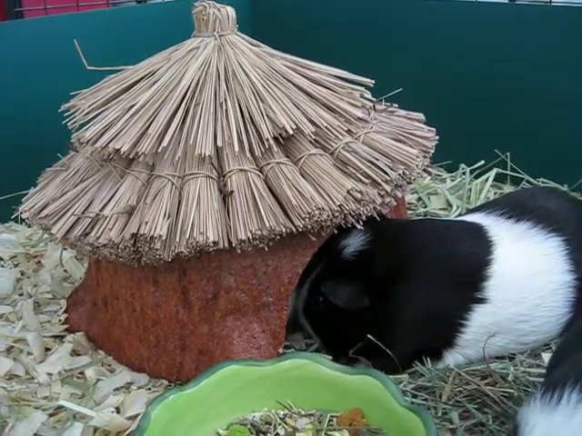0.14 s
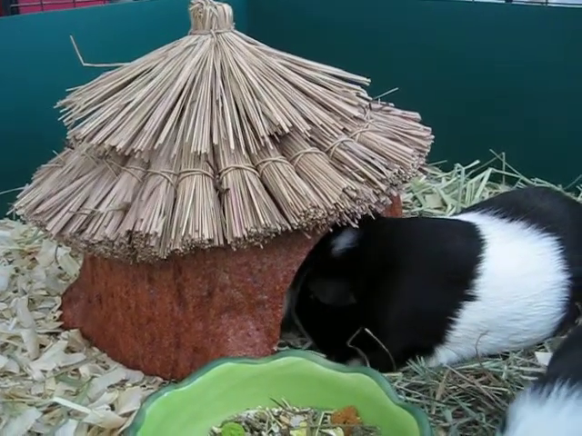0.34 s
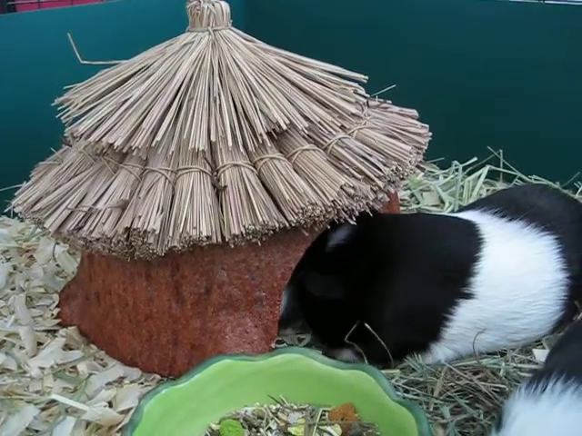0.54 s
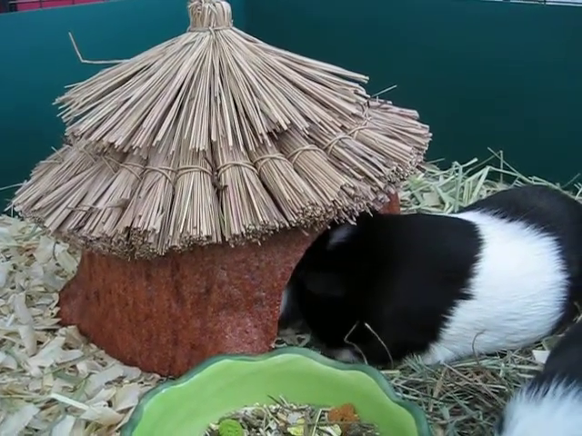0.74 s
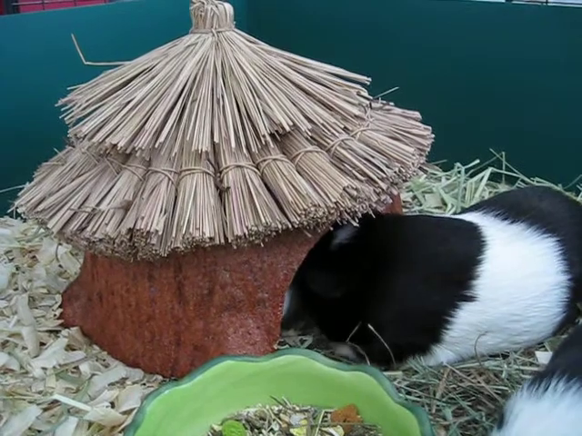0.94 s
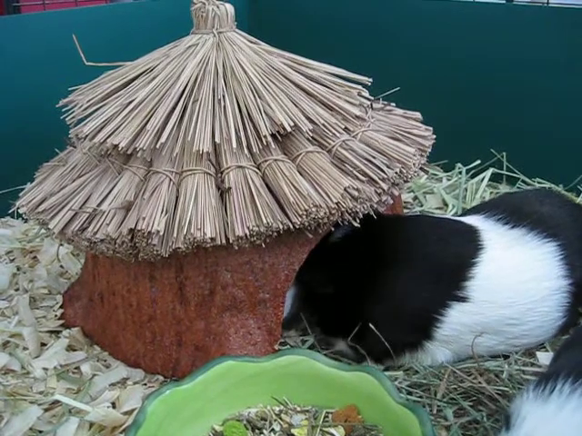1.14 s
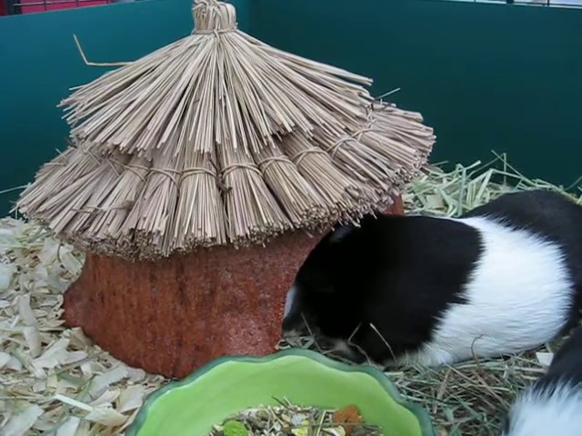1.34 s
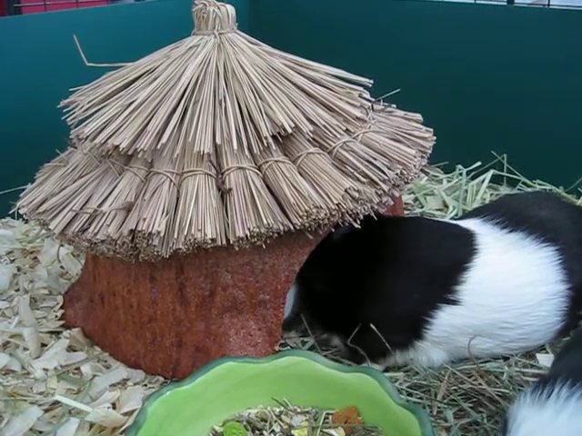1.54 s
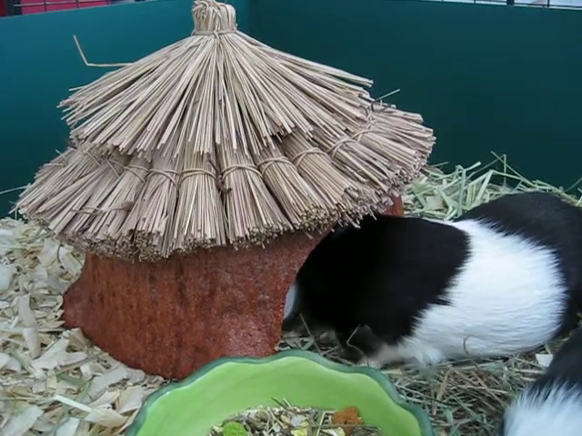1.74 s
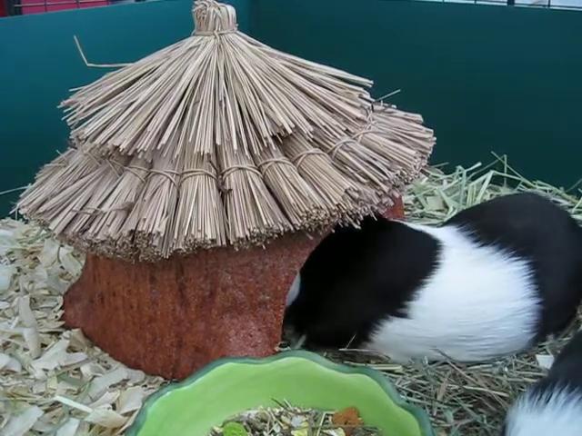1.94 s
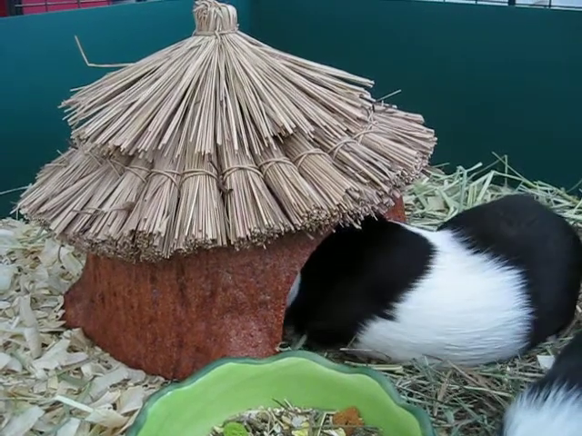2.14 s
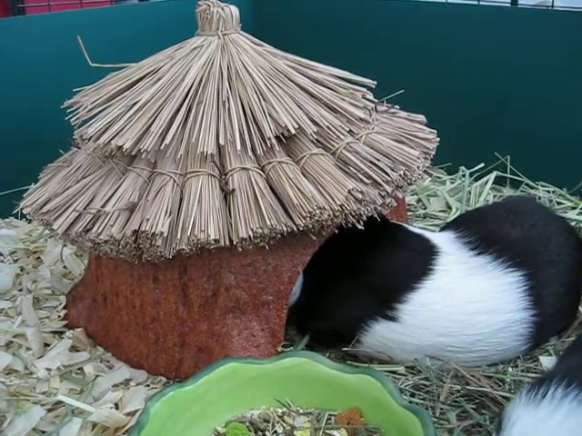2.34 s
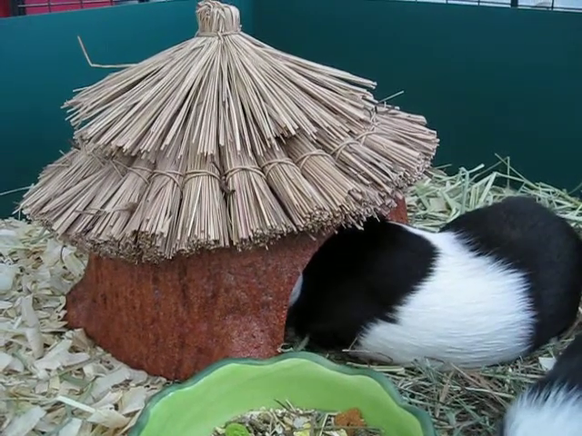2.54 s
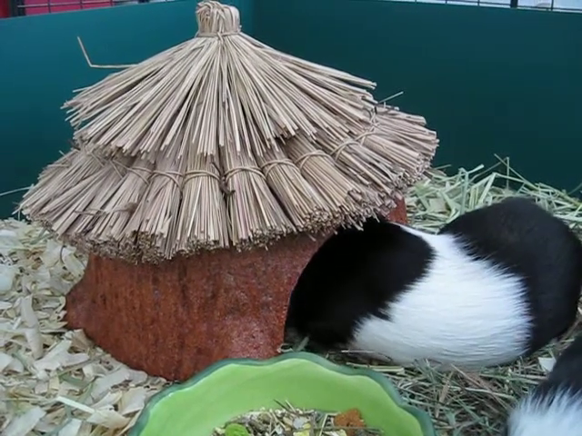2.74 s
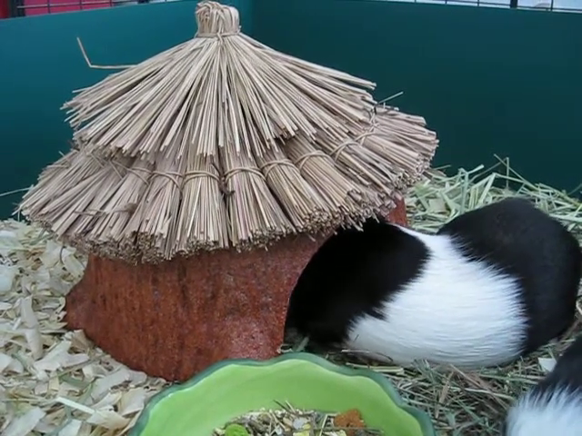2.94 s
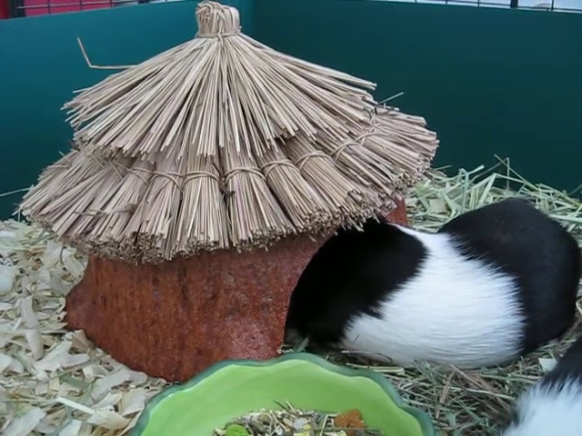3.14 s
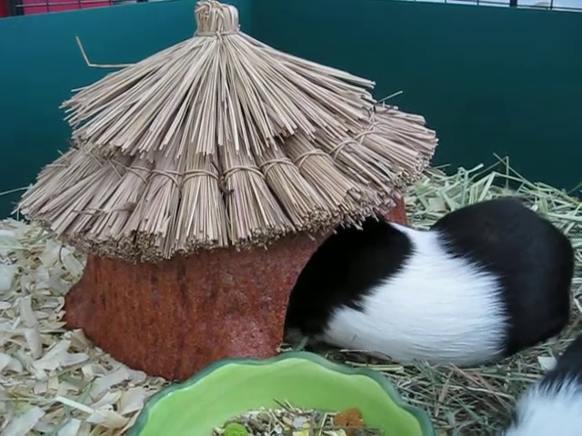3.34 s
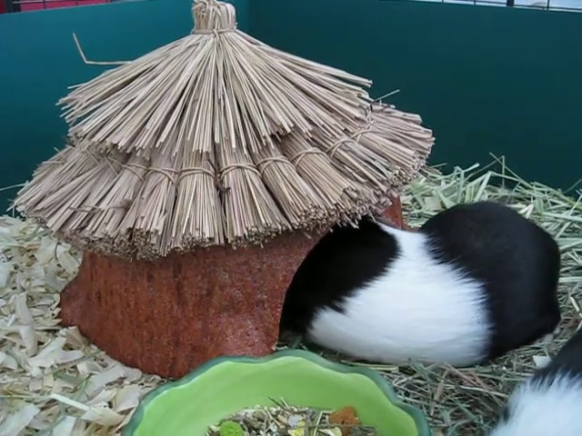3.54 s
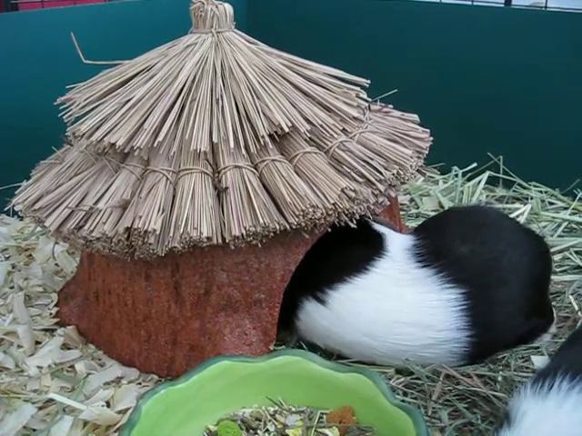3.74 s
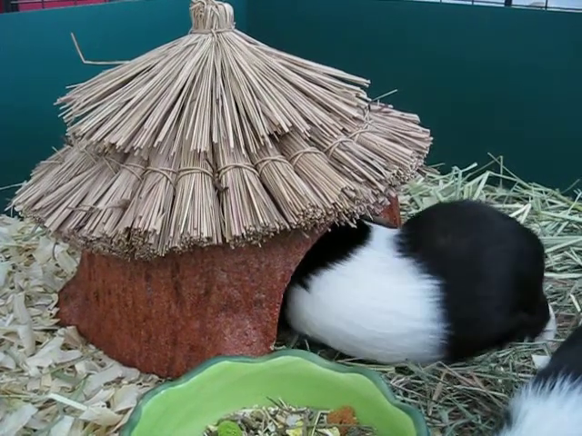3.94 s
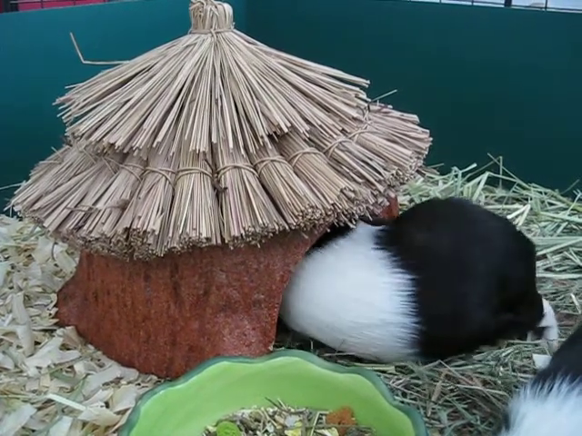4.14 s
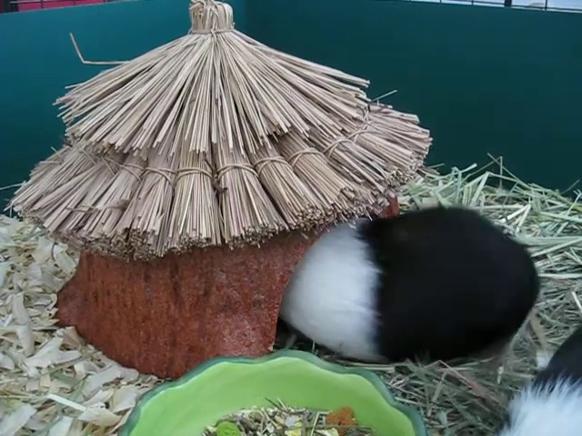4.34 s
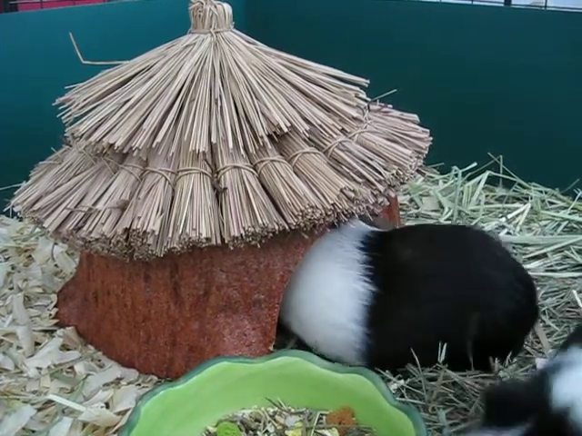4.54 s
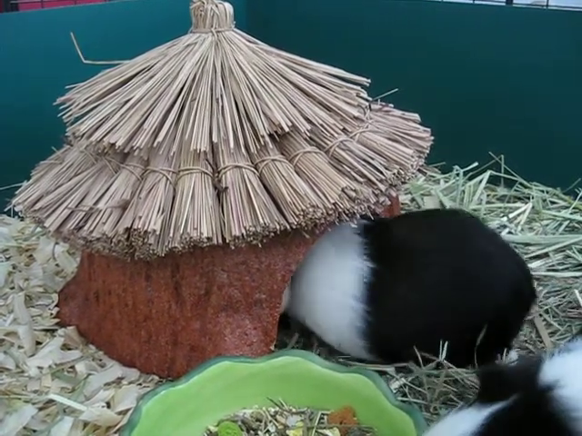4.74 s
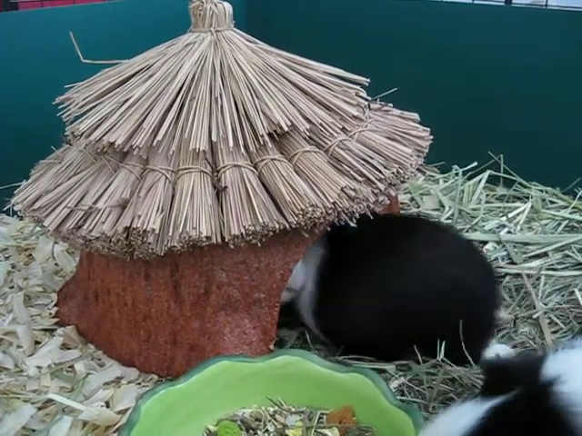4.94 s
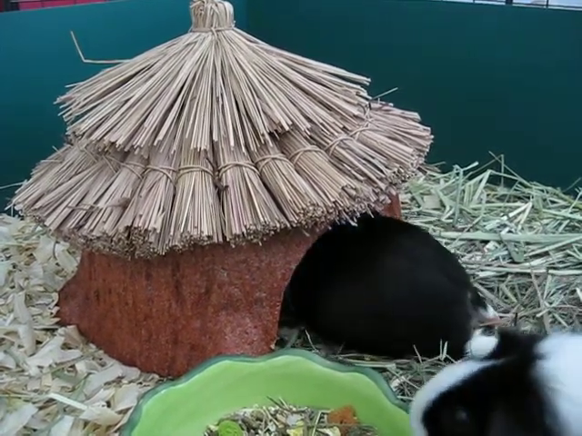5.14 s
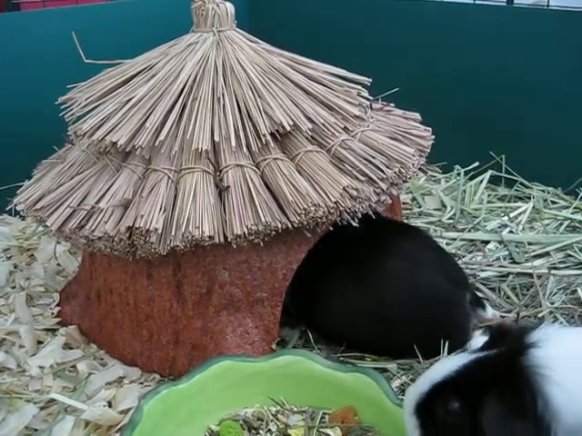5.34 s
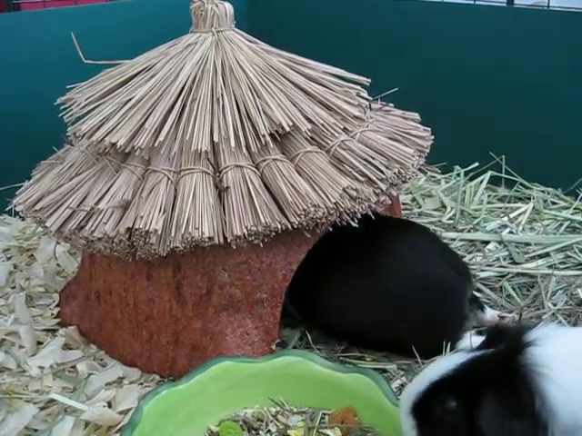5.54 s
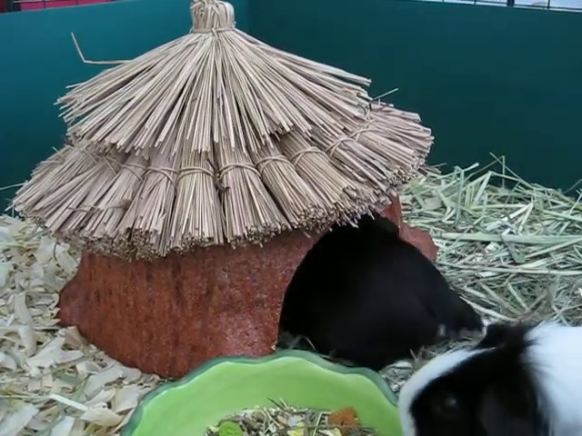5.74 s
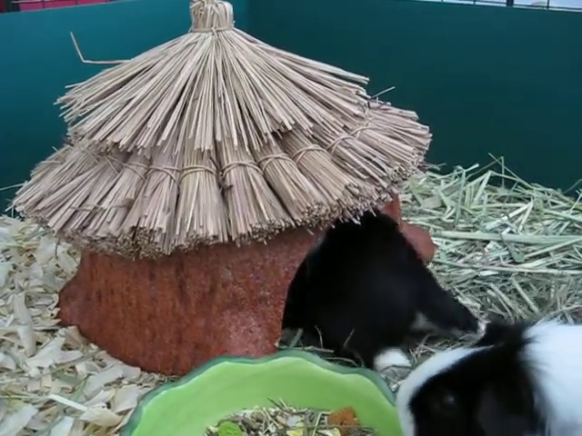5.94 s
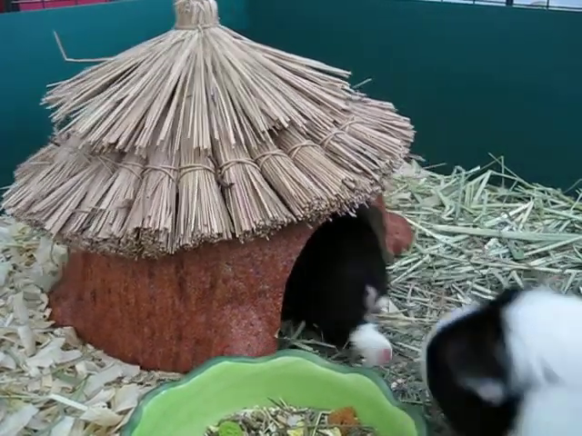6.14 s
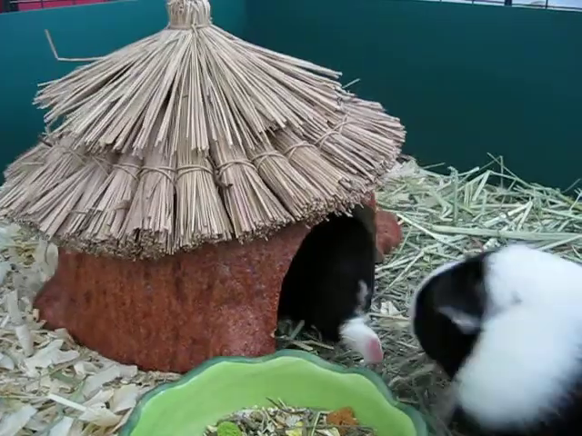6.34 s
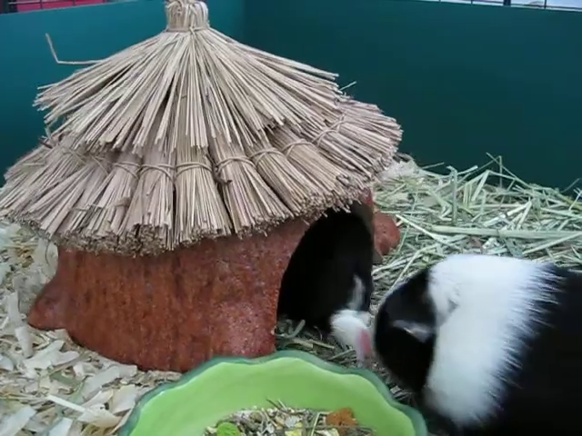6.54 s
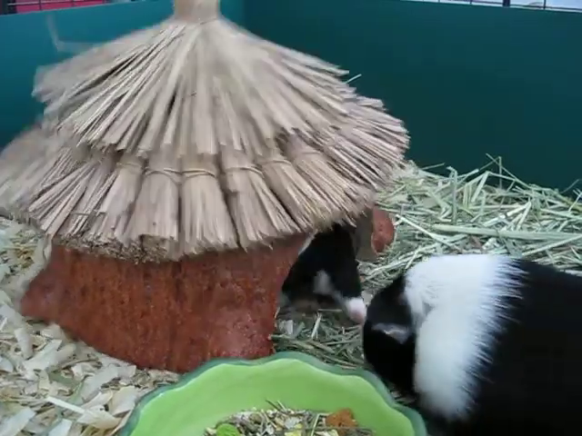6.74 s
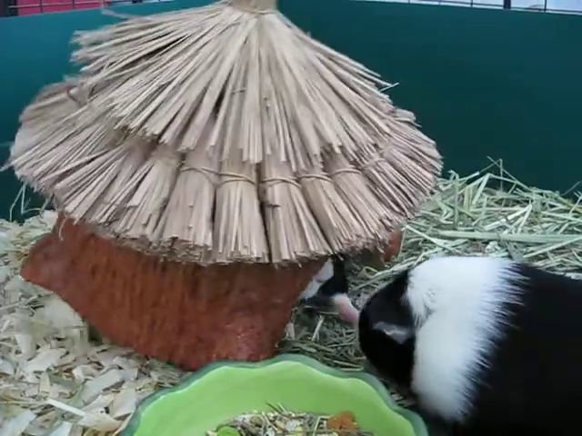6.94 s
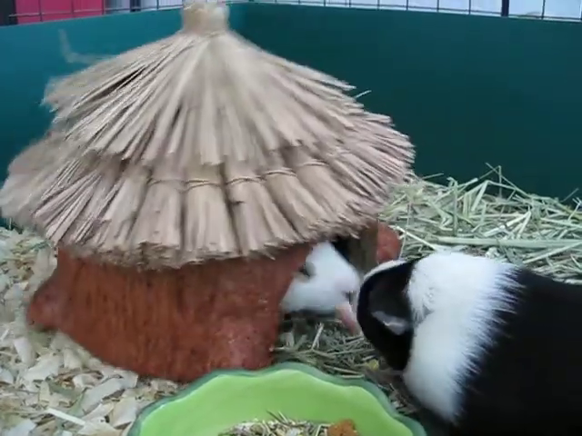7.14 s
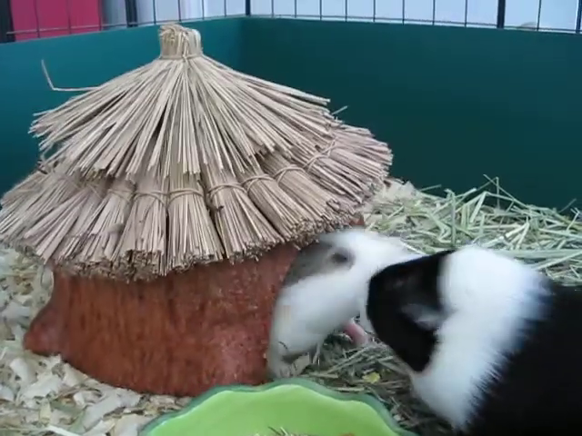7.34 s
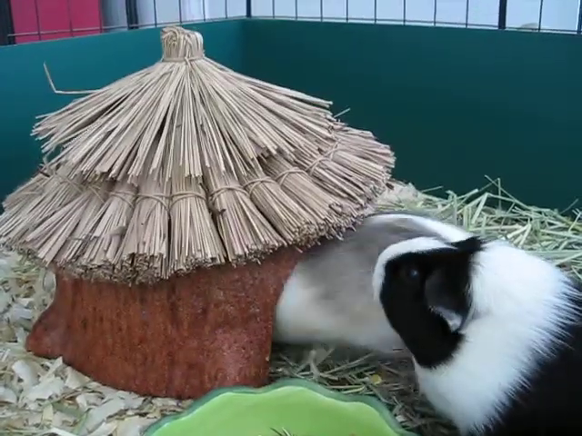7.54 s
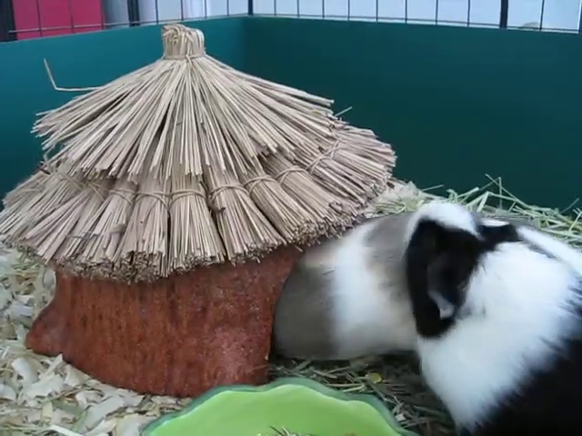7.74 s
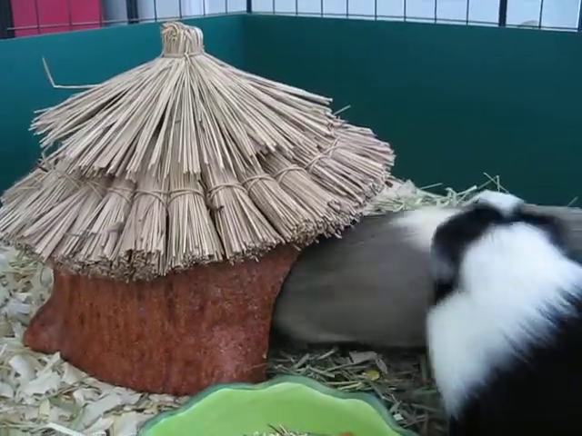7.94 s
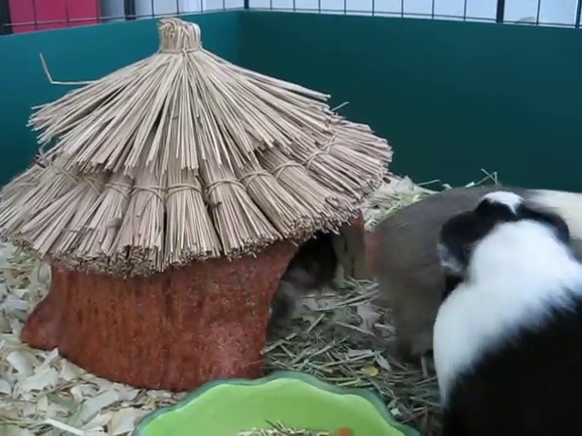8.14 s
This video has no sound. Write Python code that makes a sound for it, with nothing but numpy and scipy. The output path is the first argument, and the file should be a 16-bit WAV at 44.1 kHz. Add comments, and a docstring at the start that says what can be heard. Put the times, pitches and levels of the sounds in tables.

```python
"""Guinea pigs chut, squeak and whine in a plastic cage, close by: their vocal folds make a harmonic tone
that the throat filters and a hollow hut prolongs. One chuts softly while it pushes into the hut; then they
crowd the doorway, squeaking in rising glides among short, low bumps. Each shove rustles the dry hay by
stick-slip friction; stalks snap or are bitten through, paws excite the modes of the tray, and the room
hums faintly."""
import sys
import numpy as np
from scipy import signal
from scipy.fft import rfft, irfft
from scipy.io import wavfile

SR = 44100
rng = np.random.default_rng(int(sys.argv[2]) if len(sys.argv) > 2 else 0)


def dump_mix(stems):
    """Bounce the given channels to the path in sys.argv[1] as a 16-bit WAV at rate SR."""
    frames = np.atleast_2d(stems).T  # one column per channel
    limited = np.clip(frames, -1, 1)  # hard clip at full scale
    pcm = np.round(limited * 32767).astype(np.int16)
    wavfile.write(sys.argv[1], SR, pcm)


N = 366030


def undb(db):
    """Decibels to amplitude ratio."""
    return 10 ** (np.asarray(db) / 20)


def level(x, db=0):
    """Scale to an rms level."""
    return x * undb(db) / np.sqrt(np.mean(x ** 2))


def seconds(length):
    """Time axis of a short sound."""
    return np.arange(int(length * SR)) / SR


def add(out, start_s, x):
    """Superposition: mix x into out from start_s."""
    i = int(start_s * SR)
    out[i:i + len(x)] += x[:max(N - i, 0)]


def gain_at(spectrum, hz):
    """Gain of a (frequency_hz, level_db) curve, interpolated in log frequency."""
    knots_hz, db = np.transpose(spectrum)
    return undb(np.interp(np.log(hz + 1), np.log(knots_hz), db))


def ring(x, hz, width_hz):
    """Second-order resonance, gain 1 at its centre."""
    return signal.lfilter(*signal.iirpeak(hz, hz / width_hz, fs=SR), x)


def band(x, hz, width_hz):
    """Two equal resonances in cascade: a pass band with steeper skirts."""
    return ring(ring(x, hz, width_hz), hz, width_hz)


def wander(rate_hz, size):
    """Slow random modulation with a spread near 1."""
    place = np.arange(size) * rate_hz / SR
    knots = rng.standard_normal(int(place[-1]) + 2)
    return np.interp(place, np.arange(len(knots)), knots)


def decay(t, t60_s):
    """Exponential damping: 60 dB down at t60_s."""
    return np.exp(-np.log(1000) * t / t60_s)


# spectrum of the room's air: frequency_hz, relative_db
AIR_SPECTRUM = [(15, -37), (25, -11), (92, -9), (198, -6), (223, -7), (256, -4), (347, -6.5), (606, -6),
                (665, -7.5), (879, -7.5), (1060, -10.5), (1650, -16), (2450, -18), (3810, -21),
                (6500, -23.5), (8450, -31), (14300, -120)]
# room resonances: centre_hz, half_width_hz (of each filter stage), level_db
ROOM_MODES = [(201.5, 9.7, -69.5), (257.5, 32, -69.5), (321.6, 13, -71.5), (612, 68, -58.5)]


def room_tone(air_db=-53, hiss_db=-68):
    """Noise-driven room resonances hum over steady indoor air and a thin hiss."""
    shape = gain_at(AIR_SPECTRUM, np.fft.rfftfreq(N, 1 / SR))
    air = level(irfft(rfft(rng.standard_normal(N)) * shape, N), air_db)
    hum = sum(level(band(rng.standard_normal(N), hz, 2 * half_width_hz), db)
              for hz, half_width_hz, db in ROOM_MODES)
    return air + hum + level(rng.standard_normal(N), hiss_db)


def reverberate(x, cage_db, room_db, cage_t60_s, room_t60_s=0.35):
    """Reverberation: quick reflections from the cage walls, then the faint tail of the room."""
    t = seconds(0.32)
    response = np.zeros(len(t))
    for db, t60_s in ((cage_db, cage_t60_s), (room_db, room_t60_s)):
        tail = rng.standard_normal(len(t)) * decay(t, t60_s) * (t > .002)
        response += undb(db) * tail / np.linalg.norm(tail)
    return x + signal.fftconvolve(x, response)[:N]


# constant stir of the hay under the animals: time_s, level_db
HAY_STIR = [(0, -56.5), (.35, -61), (.72, -65), (1.0, -63), (1.5, -60), (2.15, -61.5), (3.35, -61),
            (3.75, -60.5), (4.2, -55), (4.5, -59), (5.32, -59.5), (5.82, -53), (6.25, -43), (6.5, -46),
            (7.0, -50.5), (7.25, -46.5), (7.7, -53), (8.0, -44.5), (8.3, -45.5)]
# a nose or body shoves into the hay: peak_s, length_s, level_db, crunch_db (boost of the thick stalks)
HAY_SHOVES = [(0.001, 0.071, -41.5, -11), (0.11, 0.052, -50.5, -9), (0.236, 0.078, -55.5, -18),
              (0.436, 0.056, -57, 3), (0.542, 0.082, -57, 0), (0.806, .04, -57, 0), (0.883, .06, -56, 0),
              (1.157, 0.14, -58, -1), (1.57, 0.024, -52.5, 0), (1.672, 0.027, -56, 2),
              (1.79, 0.11, -49.5, -14), (1.966, 0.076, -54, -9), (2.405, 0.036, -51, -9),
              (2.51, 0.039, -56, -4), (3.519, 0.074, -53, -6), (3.622, 0.056, -55, -11),
              (3.885, 0.088, -47, -8.5), (4.015, 0.077, -54.5, 1.5), (4.107, 0.032, -48.5, 1),
              (4.337, 0.081, -39.5, -8), (4.77, 0.081, -49, -2), (4.907, 0.16, -50, -0.5),
              (5.056, 0.041, -46.5, 2), (5.156, 0.083, -56.5, 9), (5.469, .11, -50.5, 2.5),
              (5.658, 0.056, -41, -9), (5.748, 0.041, -41.5, -4), (5.916, 0.089, -38.5, -3.5),
              (6.072, 0.17, -36, -4.5), (6.365, 0.11, -44.5, -19), (6.56, 0.026, -43.5, -11),
              (6.718, 0.086, -39.5, -1.5), (6.852, 0.075, -46, -15), (7.161, 0.13, -43, 2),
              (7.286, 0.083, -50.5, 9), (7.41, 0.058, -40.5, -3.5), (7.517, 0.017, -43, -5),
              (7.582, 0.015, -42.5, -2), (7.78, 0.03, -45, -6), (7.932, 0.072, -42, -7),
              (8.015, .04, -33.5, -7.5), (8.075, .026, -32.5, -12), (8.121, 0.018, -40.5, -5),
              (8.265, 0.047, -49, 10)]


def movement(rise_share=.48, stir_crunch_db=0.5):
    """Incoherent sources add in power: stir plus shoves give the hay's level and crunch, both in dB."""
    t = np.arange(N) / SR
    power = undb(np.interp(t, *np.transpose(HAY_STIR))) ** 2
    thick_power = power * undb(stir_crunch_db) ** 2
    for peak_s, length_s, db, crunch_db in HAY_SHOVES:
        width_s = length_s * np.where(t < peak_s, rise_share, 1 - rise_share)
        shove = undb(db) ** 2 * np.exp(-np.minimum(((t - peak_s) / width_s) ** 2, 20))
        power += shove
        thick_power += shove * undb(crunch_db) ** 2
    return 10 * np.log10(power), 10 * np.log10(thick_power / power)


def tray_rumble(relative_db=-24, movement_cap_db=-43):
    """Forced vibration: the animals' shifting weight makes the hollow tray rumble faintly."""
    rumble = level(band(rng.standard_normal(N), hz=90, width_hz=150), relative_db)
    move_db, _ = movement()
    return rumble * undb(np.minimum(move_db, movement_cap_db))


# modes of the plastic tray: frequency_hz, relative_db, t60_s
TRAY_MODES = [(125, -3, 0.16), (211, -9, 0.12), (290, 9.5, 0.082), (321, 3, 0.066), (593, 6, 0.07),
              (920, -7, .04)]
# paws on the cage floor: start_s, peak_db
PAW_STEPS = [(0.614, -50), (0.638, -42), (.655, -42), (.685, -46), (5.675, -38.5), (6.14, -39.5),
             (7.072, -38), (7.274, -36), (7.848, -37), (8.238, -35)]


def paw_steps(contact_s=0.0088):
    """Modal response: each soft paw excites the damped modes of the tray through the bedding."""
    out, t = np.zeros(N), seconds(.15)
    tray = sum(undb(db) * np.cos(2 * np.pi * hz * t) * decay(t, t60_s) for hz, db, t60_s in TRAY_MODES)
    for start_s, db in PAW_STEPS:
        force = rng.standard_normal(len(t)) * np.exp(-t / contact_s)
        bump = signal.fftconvolve(tray, force)
        add(out, start_s, undb(db) * bump / np.abs(bump).max())
    return out


def impulses(per_s, spread_db):
    """Poisson process: tiny random impulses, most weak and a few strong."""
    size = undb(spread_db * np.minimum(rng.exponential(size=N), 3.6))
    return (rng.random(N) < per_s / SR) * size * rng.choice([-1, 1], N)


# resonances of hollow stems: centre_hz, width_hz, relative_db
STEM_MODES = [(2700, 200, 2.5), (2980, 220, -5), (3460, 320, -3), (5400, 350, -6.5), (6240, 410, 0.5)]


def stem_knocks(knocks_per_s=45, relative_db=-9, movement_cap_db=-50):
    """Impact excitation: hollow stems knock together as the hay moves, each with its own woody ring."""
    move_db, crunch_db = movement()
    knocks = sum(undb(db) * level(ring(impulses(knocks_per_s, spread_db=1.7), hz, width_hz))
                 for hz, width_hz, db in STEM_MODES)
    return level(knocks, relative_db) * undb(np.minimum(move_db + crunch_db, movement_cap_db))


def fracture(hz, width_hz, splinter_s, brightness):
    """Brittle fracture: a dying burst of breaking fibres rings the stalk, with a bright edge; peak 1."""
    t = seconds(0.068)
    fibres = rng.choice([-1, 1], len(t)) * np.exp(-t / splinter_s)
    body = ring(fibres, hz, width_hz)
    edge = ring(fibres, hz=12000, width_hz=8000)
    crack = body / np.abs(body).max() + brightness * edge / np.abs(edge).max()
    return crack / np.abs(crack).max()


# teeth bite through a stalk: start_s, peak_db, ring_hz
STALK_BITES = [(.888, -39, 2800), (.939, -37, 3300), (1.1625, -33, 3100), (1.1695, -33, 3300),
               (1.196, -35, 3000), (1.669, -32, 3270), (1.758, -34, 3200), (2.077, -37, 3640),
               (2.184, -37, 2930), (2.288, -35.5, 2730), (2.77, -34, 6100), (3.156, -35, 3450),
               (5.13, -37, 3300)]


def bites():
    """Fracture under compression: each bite is one short, woody crack that rings the hollow stem."""
    out = np.zeros(N)
    for start_s, db, hz in STALK_BITES:
        add(out, start_s, undb(db) * fracture(hz, width_hz=1200, splinter_s=0.001, brightness=0.76))
    return out


# dry stalks break: start_s, peak_db, ring_hz, splinter_s (decay time of the burst)
STALK_SNAPS = [(.028, -24, 9700, .0007), (.139, -29, 3600, 0.0058), (.14, -37.5, 1240, .0039),
               (.139, -28, 9000, 0.0037), (.347, -35.5, 9500, .0009), (.474, -35, 3460, .0015),
               (.5505, -26, 6300, .001), (1.132, -33.5, 10700, .0017), (1.5668, -28, 6500, 0.0012),
               (1.5725, -29, 12500, 0.0014), (1.632, -37, 11000, .004), (1.668, -29, 7000, .0015),
               (1.674, -29.5, 6500, .0008), (2.109, -37, 10500, .0006), (2.548, -31.5, 12500, .0025),
               (3.59, -32.5, 5600, 0.0017), (3.906, -31, 3870, .003), (3.987, -33, 2750, 0.0044),
               (4.105, -32.5, 12500, 0.0046), (4.117, -30, 6500, .002), (4.304, -29, 6000, .0015),
               (4.618, -34, 10700, .0007), (5.036, -28, 2800, .01), (5.735, -28, 2940, .002),
               (5.975, -23, 3120, .0013), (6.108, -26, 3530, .001), (6.15, -17.5, 9940, 0.0019),
               (6.263, -29, 2280, .001), (6.357, -11, 12300, 0.0005), (6.565, -24, 10900, 0.0009),
               (6.718, -29, 1370, .02), (6.83, -23.5, 9600, .001), (7.146, -15, 11500, .0007),
               (7.1652, -14, 9500, .0007), (7.272, -14, 12500, .0012), (7.276, -18, 12500, .001),
               (7.274, -26, 2500, .004), (7.307, -16.5, 3770, 0.0022), (7.382, -21, 10900, 0.0022),
               (7.996, -23, 13500, .001), (8.018, -17.5, 2530, 0.0014), (8.057, -18, 5000, .0007),
               (8.062, -15, 5300, 0.0053), (8.238, -20.5, 2370, 0.0027), (8.292, -22, 1680, .002)]


def snaps(damping=0.52, hollow_hz=5500):
    """Sudden release of elastic energy: dry stalks crack sharply, at times two in quick succession."""
    out = np.zeros(N)
    for start_s, db, hz, splinter_s in STALK_SNAPS:
        width_hz = damping * hz * min(hz / hollow_hz, 1)  # thick hollow stalks ring low and long
        add(out, start_s, undb(db) * fracture(hz, width_hz, splinter_s, brightness=0.58))
    return out


# spectrum of sliding hay: frequency_hz, relative_db
HAY_SPECTRUM = [(250, 0.5), (450, -1), (700, 0.5), (1300, 1.5), (2000, 1), (3100, 4.5), (4300, -0.5),
                (6300, 1.5), (9000, 0.5), (12500, -3.5), (16000, 3.5)]


def rustle(slips_per_s=560, clump_db=1.83, thick_below_hz=4800, thick_boost_db=3.5, tick_gain=0.27):
    """Stick-slip friction: stalks slip in little clumps; more movement means more and louder slips."""
    move_db, crunch_db = movement()
    rate = slips_per_s * undb(.5 * (move_db - move_db.mean()))
    fine, thick = np.zeros(N), np.zeros(N)
    for hz in np.geomspace(250, 15000, 17):
        slips = impulses(rate, spread_db=2.5) / np.sqrt(rate)
        stalks = level(ring(slips, hz, 0.5 * hz)) * np.sqrt(hz) * gain_at(HAY_SPECTRUM, hz)
        stalks *= undb(1.45 * wander(40, N))  # each size of stalk is caught at its own moments
        thick_share = 1 / (1 + (hz / thick_below_hz) ** 4)
        thick += thick_share * stalks
        fine += (1 - thick_share) * stalks
    hay = (fine + thick * undb(crunch_db + thick_boost_db)) / np.std(fine)
    # now and then a thin dry blade cracks with a bright tick
    cracks = impulses(rate / 8, spread_db=6.4) / np.sqrt(rate)
    ticks = level(ring(cracks, hz=12500, width_hz=6000))
    return (hay + tick_gain * ticks) * undb(move_db + clump_db * wander(110, N))


def hut(x, hz=1090, ring_db=-5, smear_db=-3, t60_s=0.13):
    """Cavity resonance: the hollow hut rings on after a sound, in a boxy smear of reflections."""
    t = seconds(t60_s)
    tail = rng.standard_normal(len(t)) * decay(t, t60_s)
    reflections = signal.fftconvolve(x, tail / np.linalg.norm(tail))[:N]
    smear = band(reflections, hz, width_hz=700)
    return x + undb(ring_db) * ring(x, hz, width_hz=60) + undb(smear_db) * smear


def wall_echo(x, delay_s=.022, echo_db=-17.5):
    """Specular reflection: a wall adds one clear, delayed copy."""
    return x + undb(echo_db) * np.pad(x, (int(delay_s * SR), 0))[:N]


# response of the throat, applied to the overtones: frequency_hz, gain_db
THROAT_RESPONSE = [(200, -12), (700, 2), (1550, -3), (1900, 3.5), (2350, 9), (3050, 8.5), (3900, -11),
                   (9000, -45)]


def rough_tone(length_s, pitches_hz, swell_db, overtone_db, edge_s, hoarse,
               jitter=0.021, shimmer_db=2.0, rolloff_db=11, rasp=0.16, mouth=0.042):
    """Source and filter: an unsteady tone with overtones shaped as by a throat; fast glides turn raspy."""
    t = seconds(length_s)
    n, progress = len(t), t / length_s
    knots = np.linspace(0, 1, len(pitches_hz))
    log_pitch = np.polyval(np.polyfit(knots, np.log(pitches_hz), len(knots) - 1), progress)
    strain = np.clip(np.abs(np.gradient(log_pitch, t)) / 9, .68, 1.25)
    hz = np.exp(log_pitch) * (1 + jitter * strain * wander(289, n))
    phase = 2 * np.pi * np.cumsum(hz) / SR
    throat_shift = np.exp(mouth * wander(20, n))  # in a call, the resonance shifts with the mouth
    overtones = np.zeros(n)
    for k in range(2, 6):
        throat = gain_at(THROAT_RESPONSE, k * hz * throat_shift)
        overtones += undb(overtone_db - rolloff_db * (k - 2)) * throat * np.sin(k * phase)
    gate = np.sin(np.pi / 2 * np.clip(np.minimum(t, length_s - t) / edge_s, 0, 1)) ** 2
    shimmer = undb(shimmer_db * strain * wander(143, n))
    flutter = level(shimmer * (1 + rasp * strain * wander(900, n)))
    # a call's overtones come and go as the folds close more or less firmly
    firmness = undb(.5 * shimmer_db * strain * wander(263, n) - 3)
    # turbulent air, let through once a cycle, makes a strained call hoarse
    puffs = rng.standard_normal(n) * (1 + np.sin(phase))
    breath = level(band(puffs, hz=1170, width_hz=900))
    tone = np.sin(phase) + firmness * overtones + hoarse * strain * breath
    return tone * gate * flutter * undb(swell_db * (progress - 1))


# short, low, rough bumps that rise quickly in pitch: start_s, pitch_hz, relative_db
LOW_BUMPS = [(6.234, 294, -38), (6.296, 307, -39.5), (6.428, 338, -44.5), (6.463, 269, -38),
             (6.487, 345, -43), (7.901, 300, -41), (7.967, 262, -41), (8.036, 283, -42), (8.169, 306, -39)]


def low_bumps():
    """Random frequency modulation: jitter roughens each short, low bump as it rises quickly in pitch."""
    out = np.zeros(N)
    for start_s, hz, db in LOW_BUMPS:
        rise_hz = hz * np.array([.8, .98, 1.25])
        bump = rough_tone(0.0345, rise_hz, swell_db=0, overtone_db=-6, edge_s=0.016, hoarse=0.13,
                          jitter=0.056, rasp=0.12)
        add(out, start_s, undb(db) * bump)
    return out


# short, soft calls: start_s, pitch_hz, relative_db, overtone_db
CHUT_CALLS = [(1.833, 756, -45, -5.5), (2.166, 680, -47, -17), (2.49, 663, -43, -26),
              (2.825, 713, -42, -17), (3.11, 776, -43.5, -10), (3.351, 765, -42, -6.5),
              (3.616, 727, -44.5, -9), (4.099, 715, -44, -13), (4.334, 720, -41.5, -17),
              (4.726, 740, -42.5, -21), (4.825, 1123, -51, -13), (6.275, 675, -41.5, -18),
              (6.605, 695, -47, -18), (7.973, 785, -39.5, -1.5), (8.229, 443, -43.5, 2),
              (8.275, 435, -42, -1)]


def chuts():
    """Brief phonation: the folds vibrate through one round arch of pitch."""
    out = np.zeros(N)
    for start_s, hz, db, overtone_db in CHUT_CALLS:
        arch_hz = hz * np.array([.9, 1.01, 1.0])
        chut = rough_tone(.031, arch_hz, swell_db=-2, overtone_db=overtone_db, edge_s=.006, hoarse=.16,
                          jitter=.016, shimmer_db=1.5, rolloff_db=9.5, rasp=.09, mouth=.04)
        add(out, start_s, undb(db) * chut)
    return out


# the voices grow hoarse as the animals crowd the doorway: time_s, breath_gain
BREATHINESS = [(5.7, .12), (6.5, .27)]
# steady glides: start_s, length_s, first_hz, last_hz, relative_db, swell_db, overtone_db
SQUEAK_CALLS = [(5.014, 0.035, 940, 1560, -43, 1, -7), (5.386, 0.067, 625, 1473, -36.5, 1.5, -9),
                (5.511, 0.07, 427, 1470, -45, -5, -8), (5.696, 0.061, 471, 1196, -39.5, -1.5, -8),
                (5.746, .033, 1064, 2425, -37, 0, -8), (5.888, .085, 465.5, 1535, -38, 2.5, -5.5),
                (5.961, 0.039, 1890, 1720, -42, -5, -16), (6.015, 0.035, 1565, 1327, -40, -3, -7),
                (6.15, 0.031, 534, 760, -42, -4, -18), (6.503, 0.041, 587, 1346, -37.5, -1, -8),
                (6.777, 0.081, 569, 1155, -43.5, -6, -13), (7.078, 0.024, 1330, 1700, -38, 5, -22),
                (7.116, .092, 1655, 1523, -33.5, 0.5, -18), (7.207, .014, 1540, 1200, -37.5, -4, -20),
                (7.382, .012, 1113, 1040, -34.5, 0, -18), (7.529, 0.0086, 1047, 1230, -29.5, -0.5, -12),
                (7.417, 0.028, 747, 1300, -42.5, 3, -10), (7.599, 0.056, 416, 757, -41.5, -4, -15),
                (7.696, 0.033, 368, 643, -37.5, 1, 0), (7.767, 0.026, 280, 616, -42, -4, -11)]
# held calls: start_s, length_s, held_hz, last_hz, relative_db, swell_db, overtone_db, bend_exponent
WHINE_CALLS = [(5.427, 0.037, 790, 1034, -36, 0.5, -24, 1.8), (5.66, 0.05, 773, 1020, -36.5, 3, -11.5, 2.9),
               (5.975, 0.031, 675, 660, -36.5, -1, -11, 3), (6.176, 0.064, 786, 620, -35.5, 7, -5, 3.9),
               (6.395, 0.045, 768, 740, -39, 3, -6, 3), (6.447, 0.0097, 1096, 1230, -37.5, 0, -4, 2),
               (6.763, 0.045, 902, 1423, -34, 11.5, -4.5, 3.4), (6.957, .048, 839, 840, -32, 8, -11.5, 3),
               (7.0, 0.086, 699, 1440, -38.5, -2, -9.5, 3.03),
               (7.303, 0.079, 638, 1048, -37.5, -5.5, -4.5, 4.4),
               (7.46, 0.068, 560, 1216, -37, -1.5, -9, 3.3), (7.52, .056, 680, 1077, -41, -5, -15, 5),
               (7.78, 0.045, 1055, 1360, -38.5, -0.5, -23, 4.2), (7.813, 0.04, 673, 907, -41, -3, -14, 3),
               (7.88, 0.044, 694, 702, -30.5, 14, -22, 3), (8.103, 0.03, 740, 1420, -34, 4, -16, 4.4),
               (8.17, 0.046, 759, 1320, -38.5, 3, -11, 5.5)]


def squeaks_and_whines(squeak_bend=1.05, squeak_opening=0.97, whine_opening=1.036):
    """Frequency modulation: squeaks glide steadily; whines start sharp, settle, then flick away."""
    out, progress = np.zeros(N), np.linspace(0, 1, 7)
    glides = [(*row, squeak_bend, squeak_opening) for row in SQUEAK_CALLS]
    glides += [(*row, whine_opening) for row in WHINE_CALLS]
    for start_s, length_s, first_hz, last_hz, db, swell_db, overtone_db, bend, opening_ratio in glides:
        pitches_hz = first_hz + (last_hz - first_hz) * progress ** bend
        pitches_hz[0] *= opening_ratio
        hoarse = np.interp(start_s, *np.transpose(BREATHINESS))
        call = rough_tone(length_s, pitches_hz, swell_db, overtone_db, edge_s=0.0027, hoarse=hoarse)
        add(out, start_s, undb(db) * call)
    return out


def scene(tone_gain_db=2.0):
    """Superposition: voices, bumps, hay and paws reverberate in the cage, over the room tone."""
    tones = chuts() + low_bumps() + squeaks_and_whines()
    tones = wall_echo(hut(tones)) * undb(tone_gain_db)
    tones = reverberate(tones, cage_db=-14, room_db=-10.5, cage_t60_s=0.083)
    bedding = rustle() + stem_knocks() + snaps() + bites() + paw_steps() + tray_rumble()
    bedding = reverberate(bedding, cage_db=-16.5, room_db=-13, cage_t60_s=0.013)
    return (tones + bedding + room_tone())[None]


def record(dry, notch_hz=7900, top_hz=16000):
    """Band-stop and low-pass filtering: the treble has a deep notch and the very top is cut."""
    notched = signal.lfilter(*signal.iirnotch(notch_hz, Q=3.6, fs=SR), dry)
    return signal.sosfilt(signal.ellip(10, .2, 70, top_hz, fs=SR, output="sos"), notched)


dry = scene()
out = record(dry)
dump_mix(out)
```